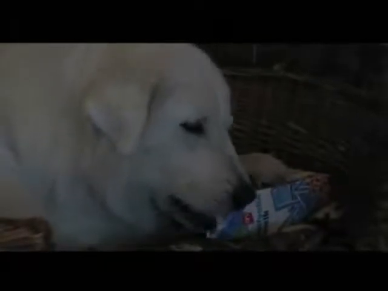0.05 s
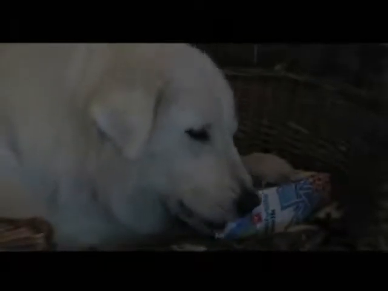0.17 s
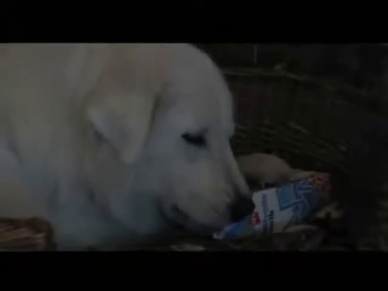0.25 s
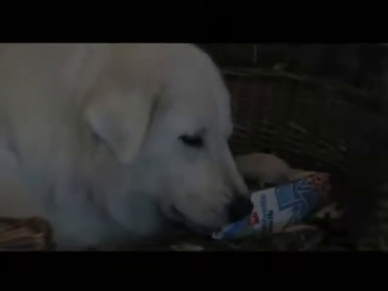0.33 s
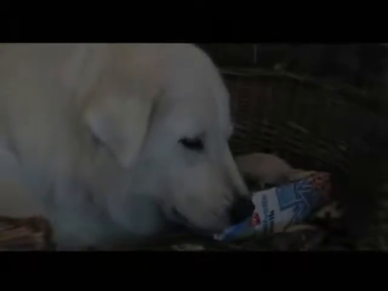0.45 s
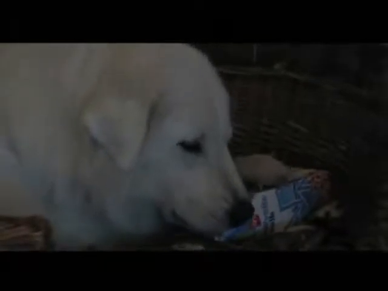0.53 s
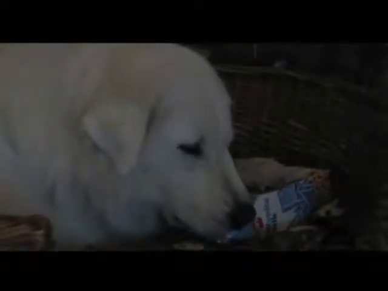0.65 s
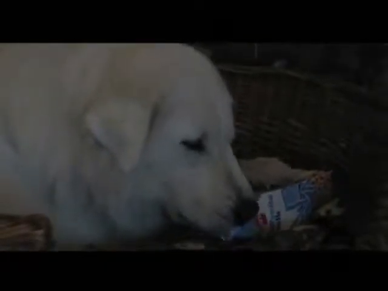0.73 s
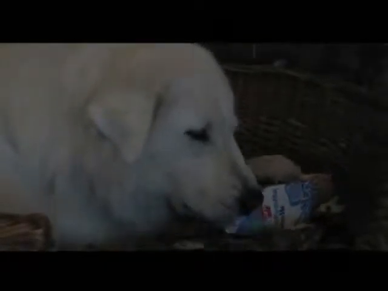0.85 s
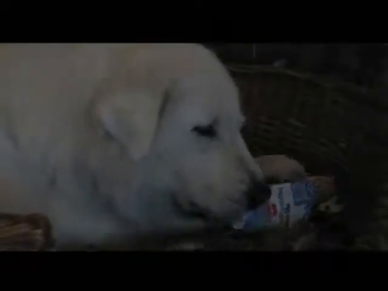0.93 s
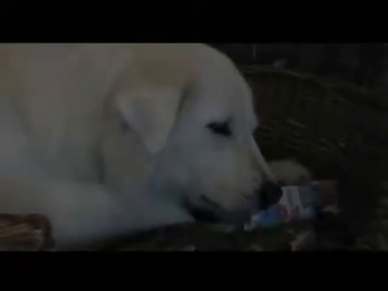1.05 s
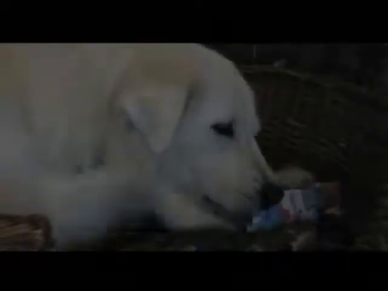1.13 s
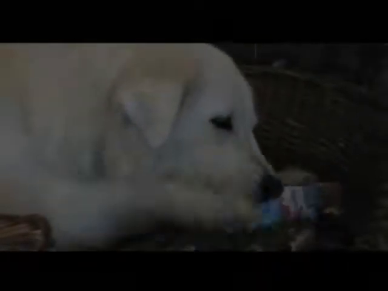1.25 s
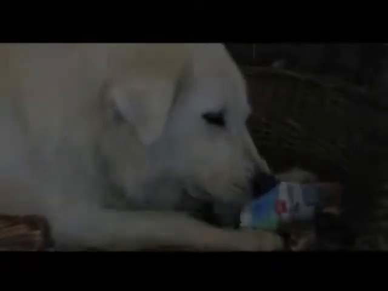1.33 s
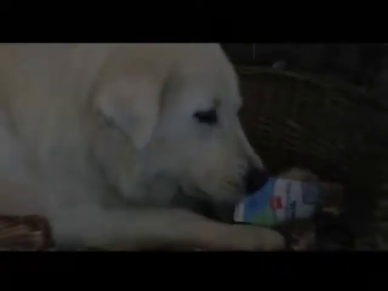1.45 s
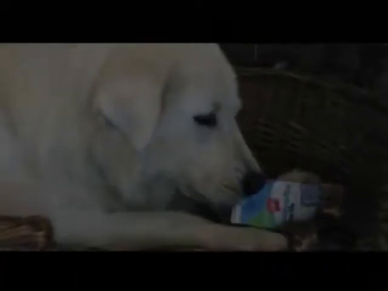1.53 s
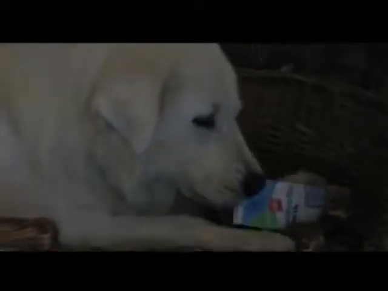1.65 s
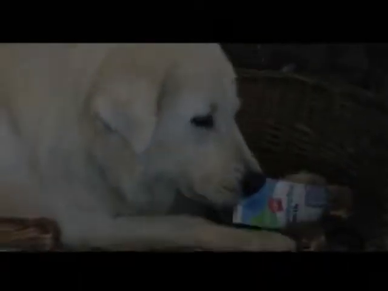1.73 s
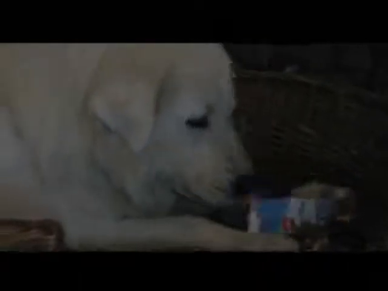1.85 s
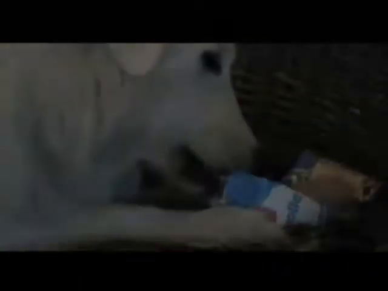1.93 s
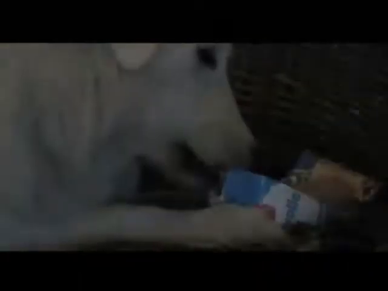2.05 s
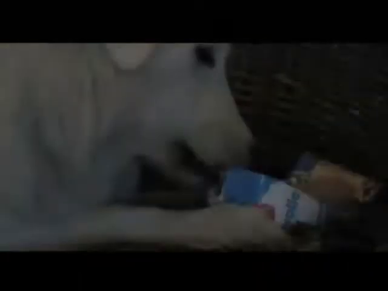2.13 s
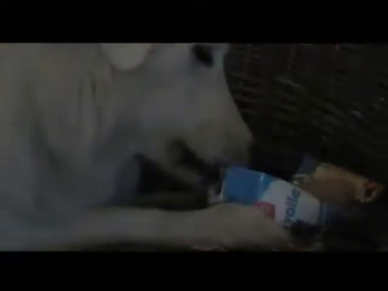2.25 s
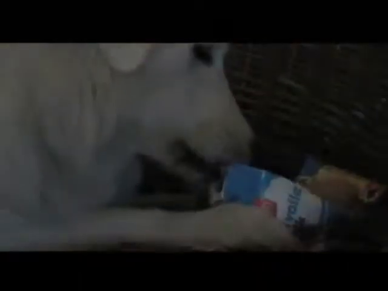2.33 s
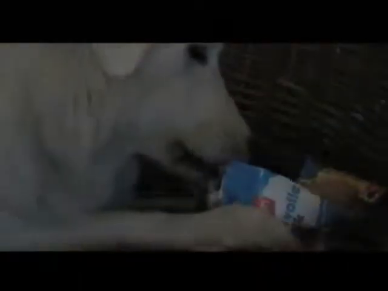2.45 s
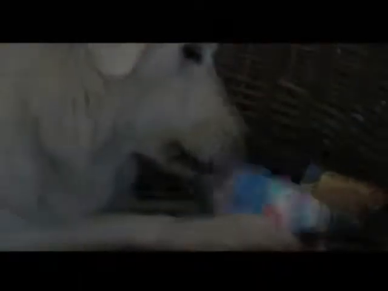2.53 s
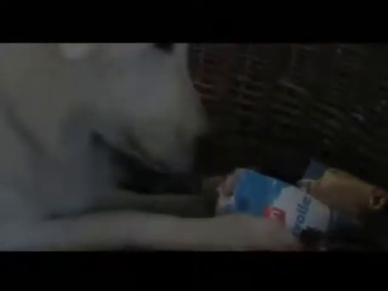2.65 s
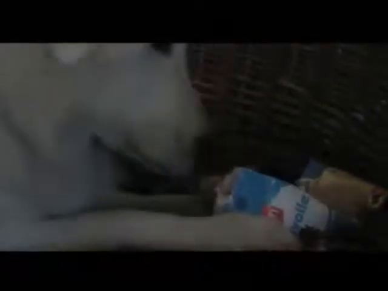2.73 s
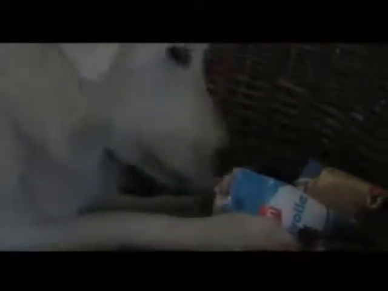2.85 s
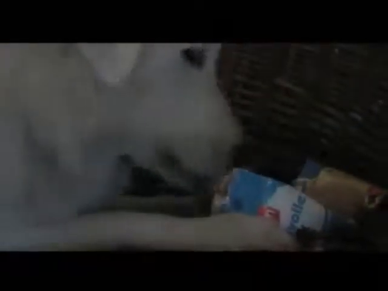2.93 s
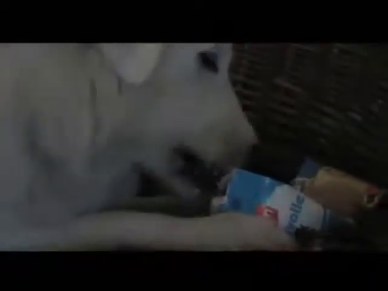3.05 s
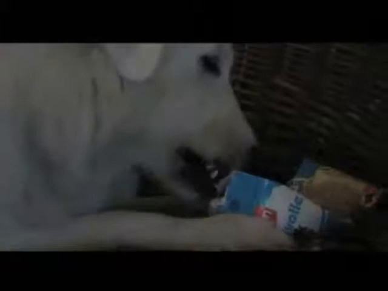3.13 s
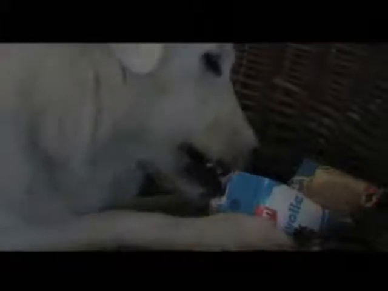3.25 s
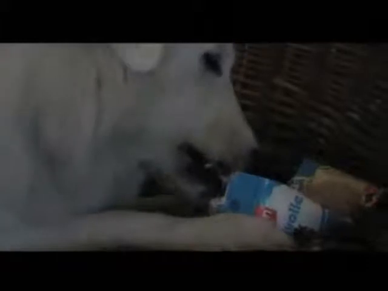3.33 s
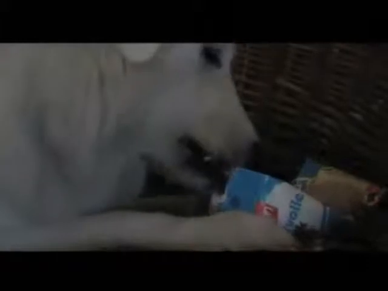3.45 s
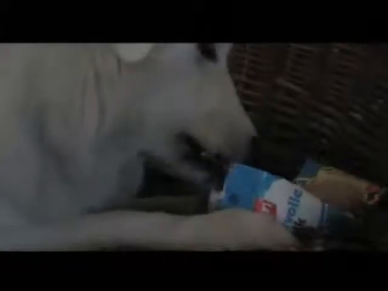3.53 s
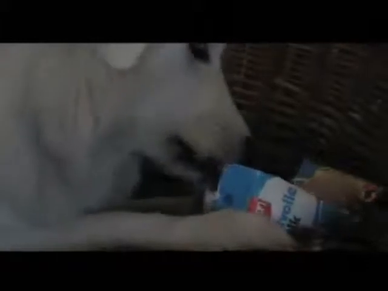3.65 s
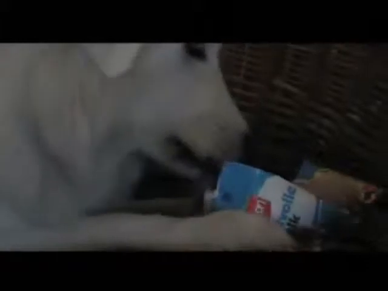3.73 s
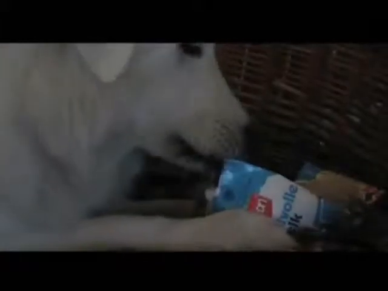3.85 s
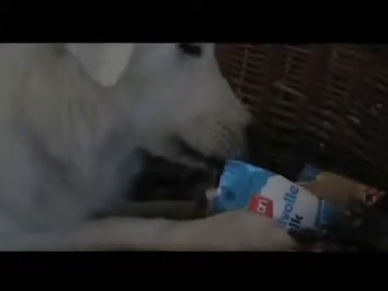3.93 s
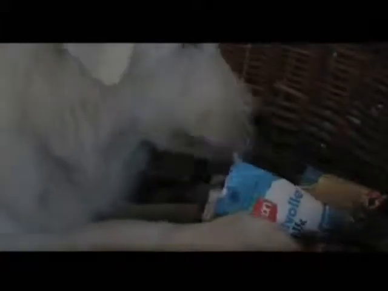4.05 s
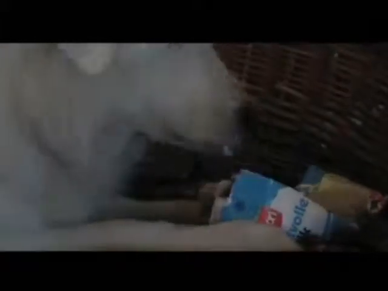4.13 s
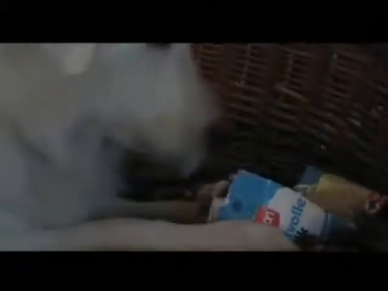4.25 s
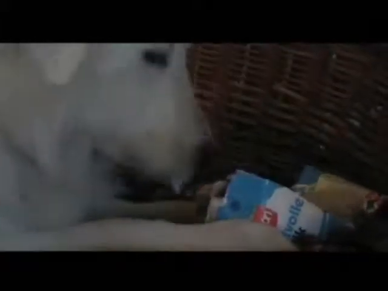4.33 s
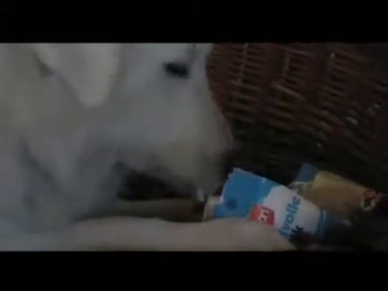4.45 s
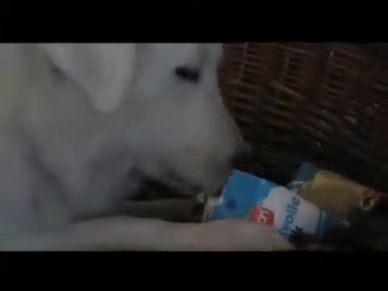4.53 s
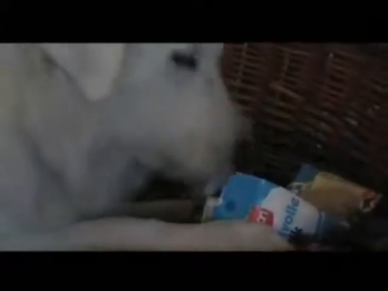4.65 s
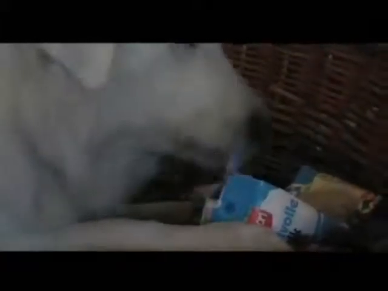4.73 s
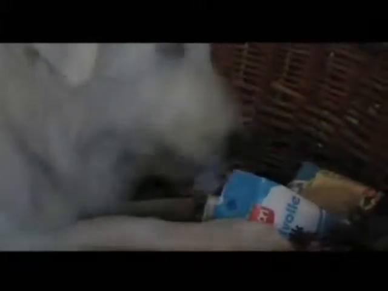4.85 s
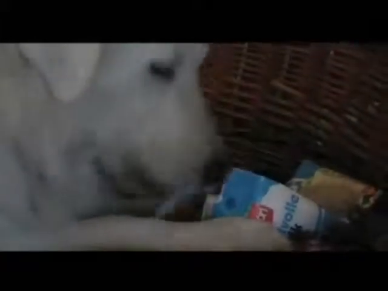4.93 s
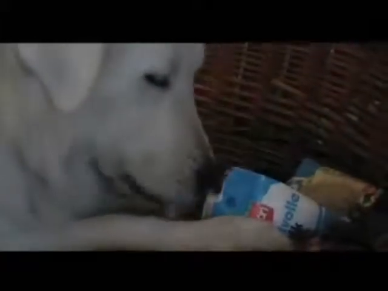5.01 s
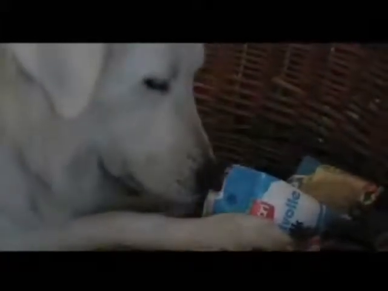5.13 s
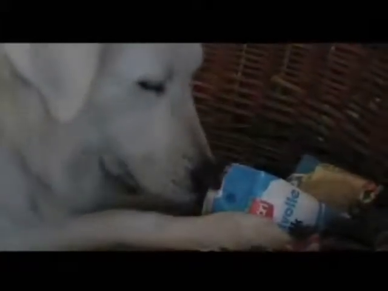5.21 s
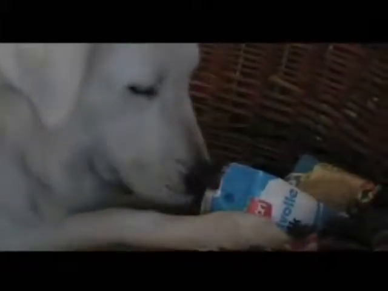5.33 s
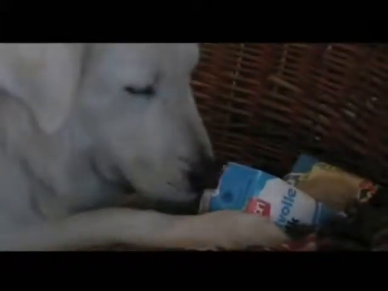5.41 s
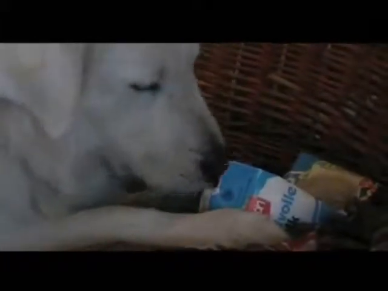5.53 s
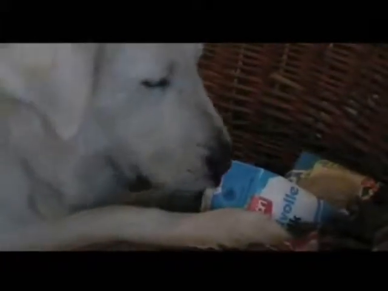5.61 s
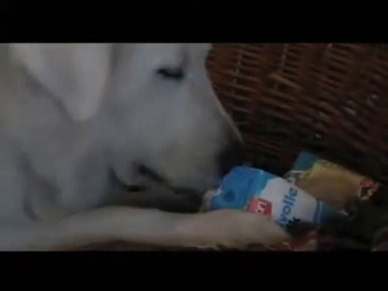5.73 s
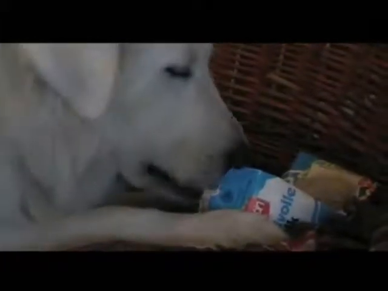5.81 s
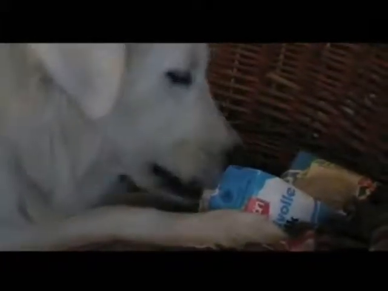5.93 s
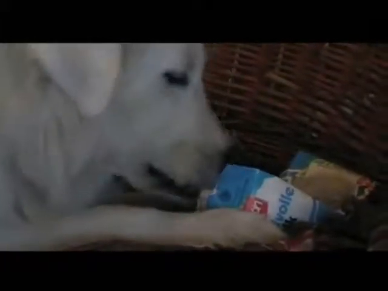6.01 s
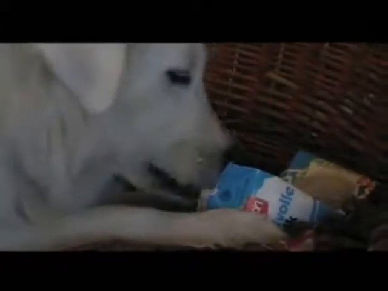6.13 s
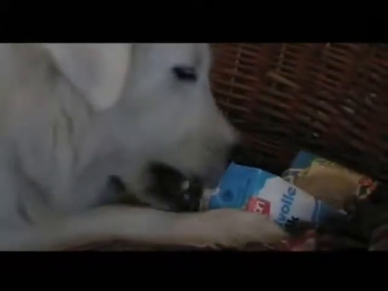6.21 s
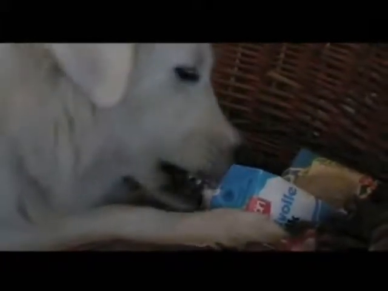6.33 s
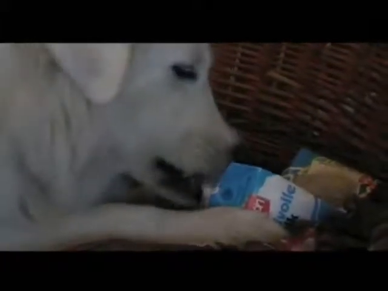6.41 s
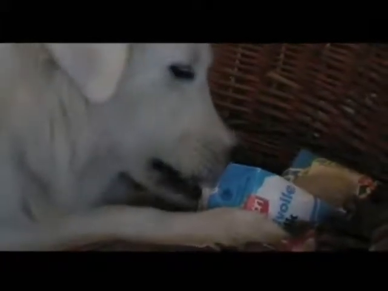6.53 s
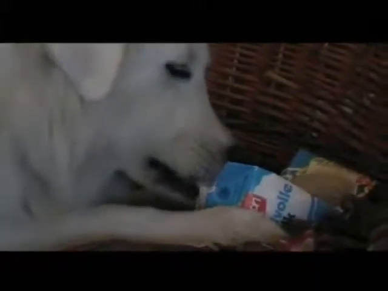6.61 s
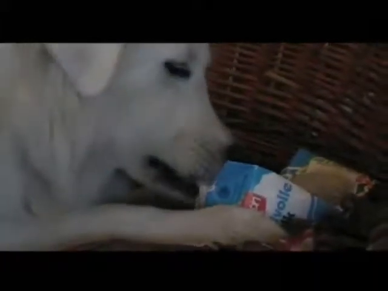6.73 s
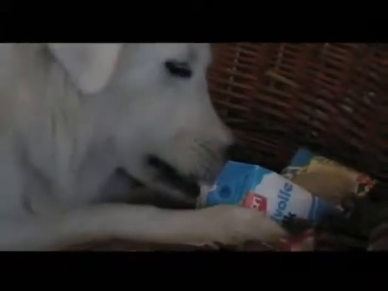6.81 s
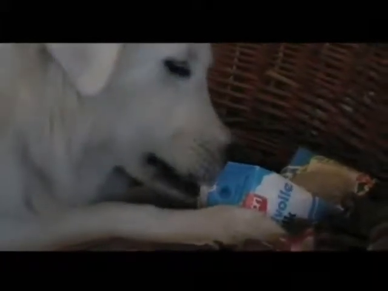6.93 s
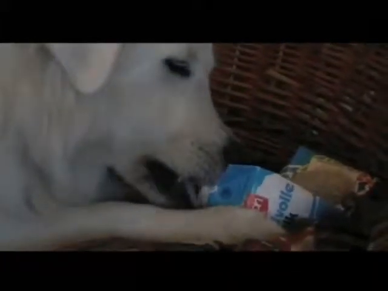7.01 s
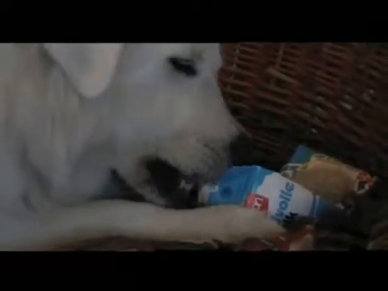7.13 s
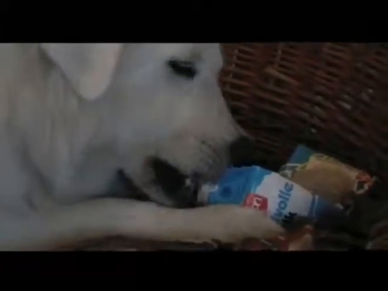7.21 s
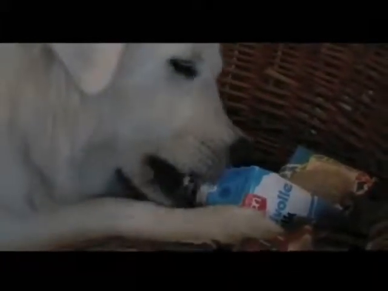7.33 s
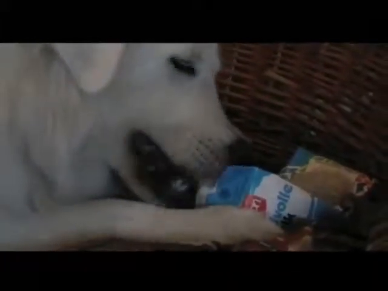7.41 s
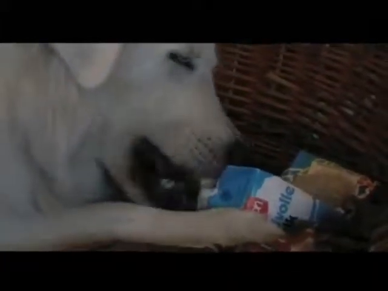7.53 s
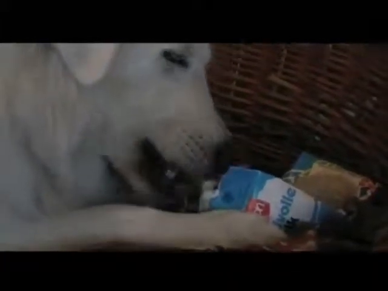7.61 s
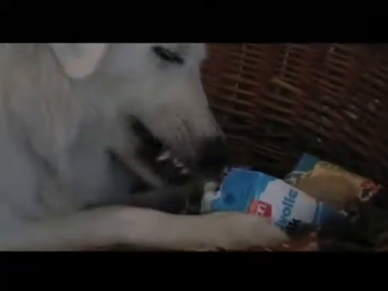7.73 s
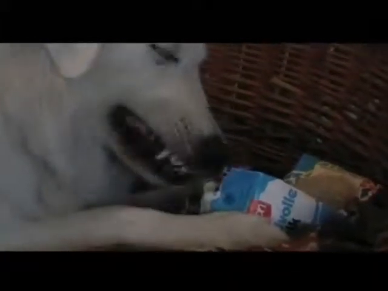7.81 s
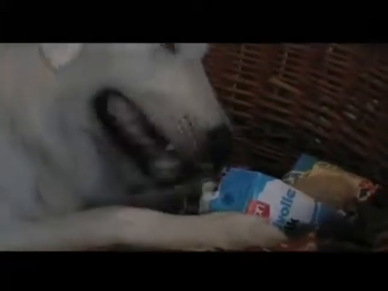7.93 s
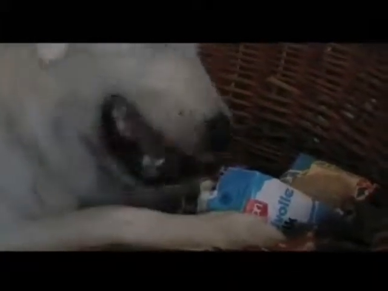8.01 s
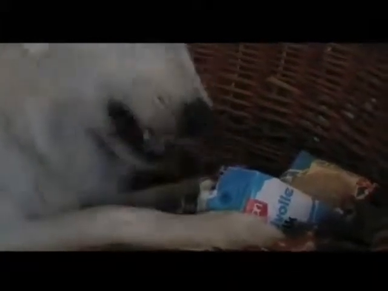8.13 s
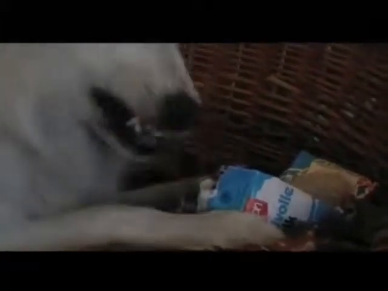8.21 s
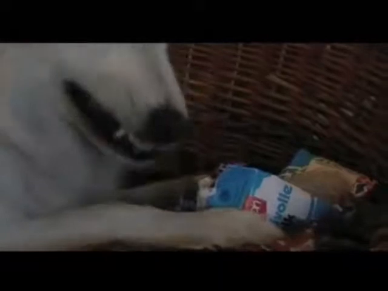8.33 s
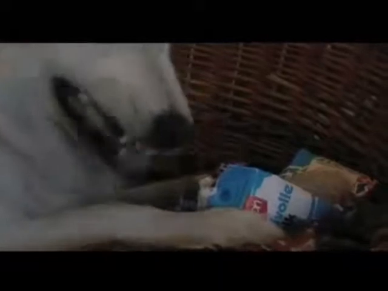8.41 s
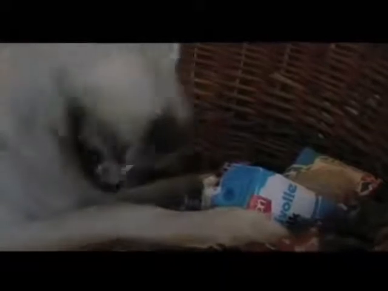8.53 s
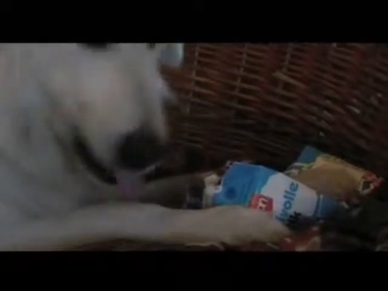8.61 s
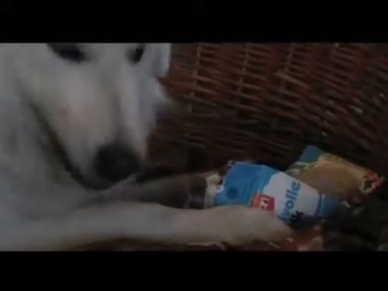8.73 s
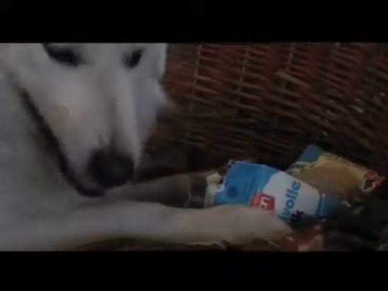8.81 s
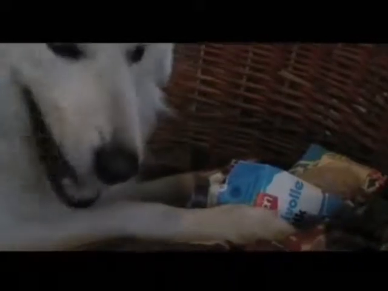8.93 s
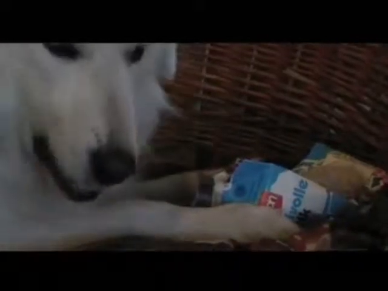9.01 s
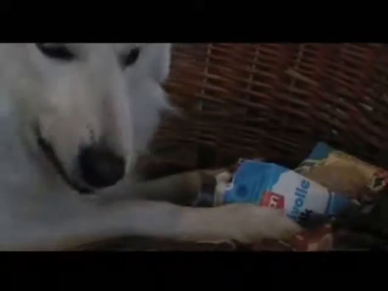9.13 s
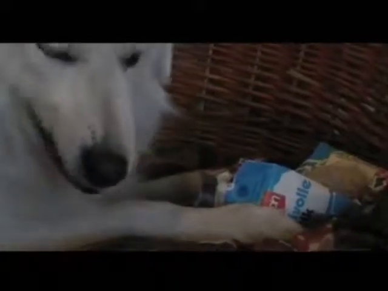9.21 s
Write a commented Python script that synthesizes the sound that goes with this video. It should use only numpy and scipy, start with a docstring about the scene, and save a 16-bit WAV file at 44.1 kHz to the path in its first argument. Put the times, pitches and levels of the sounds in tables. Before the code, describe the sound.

A large dog paws at a cardboard drink carton, fur scuffing on coated paper. It bites in with hollow knocks, crunching folds and bright crackles, the two hardest bites coming in the first half. Softer bites and rubbing follow, then chewing with clicking teeth, lip smacks and small saliva squelches. The microphone is close, in a hard room with a short echo. A faint motor whine and hiss continue throughout.

```python
"""A close motor whines over a steady hiss throughout. From the start a large dog paws a drink carton in a
wicker basket, fur dragging on coated paper, then bites and tears it: the hollow carton booms, folds crunch, the
paper crackles, teeth and lips click. A hard room rings on; at 1.99 s the room's ring stops dead, once. The
hardest bites land near 2.6 and 4.1 s. Then the dog chews the scraps with wet smacks, and from about 8 s saliva
squelches as the jaws part."""
import sys
import numpy as np
from scipy import signal
from scipy.fft import rfft, irfft, next_fast_len
from scipy.io import wavfile

SR = 44100
rng = np.random.default_rng(int(sys.argv[2]) if len(sys.argv) > 2 else 0)


def unload_audio(sound):
    """Save the sound as a 16-bit wav file, at the path given as the first command line argument."""
    columns = np.transpose(np.atleast_2d(sound))
    # keep every value between -1 and 1, then stretch to whole-number steps
    steps = np.round(np.clip(columns, -1, 1) * 32767)
    wavfile.write(sys.argv[1], SR, steps.astype(np.int16))


N = 408366
FFT_SIZE = next_fast_len(N, True)
FFT_HZ = np.maximum(np.fft.rfftfreq(FFT_SIZE, 1 / SR), 1)


def from_db(db):
    return np.exp(np.asarray(db) * np.log(10) / 20)


def unit_rms(x):
    return x / np.sqrt(np.mean(x ** 2) + 1e-20)


def at_hz(curve, hz):
    """Curve value, interpolated over log frequency."""
    curve_hz, values = np.array(curve).T
    return np.interp(np.log(hz), np.log(curve_hz), values)


def colour(x, spectrum):
    """Spectral shaping; white noise keeps its power."""
    gain = unit_rms(from_db(at_hz(spectrum, FFT_HZ)))
    return irfft(rfft(x, FFT_SIZE) * gain, FFT_SIZE)[..., :N]


def drift(rate_hz):
    """Slow random wander, rms 1."""
    hop, settle = 40, 2000
    pole = np.exp(-2 * np.pi * rate_hz * hop / SR)
    noise = rng.standard_normal(N // hop + settle + 2)
    slow = signal.lfilter([1], [1, -2 * pole, pole * pole], noise)[settle:]
    return np.interp(np.arange(N) / hop, np.arange(len(slow)), unit_rms(slow))


def grains(per_s, spread_db):
    """Random snaps of uneven size, rms 1."""
    sizes = from_db(spread_db * np.minimum(rng.exponential(1, N), 5)) * rng.choice([-1, 1], N)
    return unit_rms(sizes * (rng.random(N) < per_s / SR))


def cavity(x, hz, q):
    """Broad resonance of carton or mouth, passed three times as board and gums are soft; peak 1."""
    radius = np.exp(-np.pi * hz / q / SR)
    poles = [1, -2 * radius * np.cos(2 * np.pi * hz / SR), radius * radius]
    bandpass, lowpass = [1, 0, -1] + poles, [1, 2, 1] + poles
    ring = signal.sosfilt([bandpass, bandpass, lowpass], x + 1e-18)
    return ring / np.max(np.abs(ring))


# Motor overtones: (harmonic [number], level re MOTOR_DB [dB])
MOTOR_HARMONICS = [(1, -21.5), (2, -15.5), (3, -19), (4, -29.5), (5, -10.5), (6, 0.5), (7, -20.5), (8, -18),
                   (9, -27), (10, -63), (11, -34), (12, -28.5), (13, -31.5), (14, -29.5), (15, -32),
                   (16, -28.5), (17, -28.5), (18, -25), (19, -23.5), (20, -33), (21, -32), (22, -35),
                   (23, -32), (24, -40), (25, -44), (26, -34), (27, -31), (28, -37), (29, -41.5), (30, -45),
                   (31, -32), (32, -34), (33, -29), (34, -28.5), (35, -31), (36, -24), (37, -31), (38, -26),
                   (39, -41), (40, -31), (41, -34)]
# Further motor whine tones, between and above the 300 Hz harmonics: (frequency [Hz], rms level [dB])
FURTHER_WHINE_TONES = [(807, -73.5), (1350, -75), (1700, -83), (2550, -81), (3553, -87), (7106, -83.5),
                       (10013, -83), (10191, -88), (12452, -94)]
MOTOR_HZ, MOTOR_DB = 300.0, -57


def motor_whine():
    """Harmonics of an even motor pulse plus further whine tones, each wavering slightly in level."""
    t = np.arange(SR) / SR   # 1 s of whole cycles, looped
    harmonics = [(k * MOTOR_HZ, MOTOR_DB + level_db) for k, level_db in MOTOR_HARMONICS]
    whine = np.zeros(N)
    for hz, level_db in harmonics + FURTHER_WHINE_TONES:
        cycles = round(hz) * t + 0.34 * rng.random()
        tone = np.sqrt(2) * from_db(level_db) * np.sin(2 * np.pi * cycles)
        whine += np.resize(tone, N) * (1 + 0.043 * drift(rate_hz=3.3))
    return whine


# Hiss spectrum: (frequency [Hz], gain [dB])
HISS_SPECTRUM = [(20, -13), (60, -9), (166, -4), (500, -5), (900, -5), (1400, -11), (2000, -10),
                 (2500, -15), (4300, -23), (7000, -22), (10500, -24), (11800, -32.5), (12600, -32),
                 (13000, -46)]
# Left-right likeness: (frequency [Hz], correlation [0..1])
HISS_CORRELATION = [(60, 0.63), (300, 0.17), (1300, 0.07), (3000, 0.067), (6000, 0.043), (12000, 0.32)]
HISS_DB = -58


def hiss():
    """Room air and noise floor, partly shared by left and right, swelling slightly."""
    mid, side = rfft(rng.standard_normal((2, FFT_SIZE)))
    correlation = at_hz(HISS_CORRELATION, FFT_HZ)
    spectra = np.sqrt(1 + correlation) * mid + np.sqrt(1 - correlation) * side * [[1], [-1]]
    noise = irfft(spectra, FFT_SIZE)[:, :N]
    return from_db(HISS_DB + 0.8 * drift(rate_hz=3)) * unit_rms(colour(noise, HISS_SPECTRUM))


# Dull scuff, mid crunch and bright crackle spectra: (frequency [Hz], gain [dB])
SCUFF_SPECTRUM = [(30, -31), (140, -7), (300, 0), (700, 2.5), (1100, 0.5), (1500, -12), (3000, -26)]
CRUNCH_SPECTRUM = [(600, -3.5), (1100, -2), (1600, 3.5), (2400, -0.5), (3500, -8), (4700, -20.5),
                   (7000, -70)]
CRACKLE_SPECTRUM = [(3000, -1.5), (4900, -11), (5900, 1), (7200, 5), (9500, 6.5), (11200, 6), (12300, 4),
                    (13000, -32)]
# Paw and muzzle strokes: (peak time [s], length [s], scuff [dB], rasp [dB], rustle [dB])
STROKES = [(0.01, 0.39, -61, -52, -64.5), (0.087, 0.12, -51, -69, -54), (0.25, 0.3, -57, -52, -58),
           (0.504, 0.39, -46, -47, -54.5), (0.695, 0.49, -49, -48, -53), (0.86, 0.63, -47.5, -47.5, -55.5),
           (1.001, 0.32, -44, -44.5, -50.5), (1.065, 0.33, -42.5, -47.5, -50.5),
           (1.302, 0.19, -52, -66, -51.5), (1.42, 0.38, -51.5, -52.5, -59.5),
           (1.642, 0.23, -47.5, -55, -59.5), (1.89, 0.41, -59, -56, -61.5), (2.105, 0.2, -69, -74, -63),
           (2.214, 0.54, -58, -75, -69), (2.42, 0.53, -58, -57.5, -57), (2.596, 0.094, -40, -42, -40),
           (3.13, 0.82, -57.5, -74, -73), (3.54, 0.13, -57, -70, -69), (3.868, 0.37, -59.5, -57, -59),
           (4.017, 0.43, -69, -53.5, -58.5), (4.097, 0.12, -41, -38, -40), (4.55, 0.15, -53.5, -62, -64.5),
           (4.71, 0.21, -50.5, -57, -67.5), (5.036, 0.35, -60.5, -61, -73), (5.16, 0.15, -66, -65, -65),
           (5.575, 0.5, -60, -77, -82), (5.803, 0.39, -57, -60, -69), (5.903, 0.25, -62, -64, -65),
           (5.98, 0.36, -66, -57.5, -67), (6.436, 0.066, -58, -61, -78), (7.013, 0.19, -60, -64, -68),
           (7.154, 0.24, -62, -61.5, -69), (7.438, 0.3, -61, -82, -82), (7.60, 0.1, -55, -75, -73),
           (7.80, 0.13, -73, -72, -65), (8.07, 0.15, -68, -60, -63), (8.358, 0.2, -77, -63, -61),
           (8.604, 0.38, -60, -59, -62), (9.22, 0.75, -66, -63, -78)]
STROKE_EDGE_DB, STROKE_RISE_SHARE = -20, 0.35   # level at both ends re peak; swell over length
FUR_STIR_DB = (-69.5, -67, -86.5)   # scuff, rasp, rustle between strokes


def rubs():
    """Fur and paws drag on coated paper: dense, clumped grains; each stroke swells and dies away."""
    t = np.arange(N) / SR
    power = np.outer(from_db(FUR_STIR_DB), from_db(3.5 * drift(rate_hz=3))) ** 2
    for peak_s, length_s, *levels_db in STROKES:
        span = slice(max(round((peak_s - 2 * length_s) * SR), 0), round((peak_s + 2 * length_s) * SR))
        offset = (t[span] - peak_s) / length_s
        from_peak = np.maximum(-offset / STROKE_RISE_SHARE, offset / (1 - STROKE_RISE_SHARE))
        power[:, span] += np.outer(from_db(levels_db), from_db(STROKE_EDGE_DB * from_peak)) ** 2
    clumps = unit_rms(from_db(0.52 * drift(rate_hz=31)))
    scuff, rasp, rustle = np.sqrt(power) * clumps
    return (colour(scuff * grains(per_s=6000, spread_db=2.5), SCUFF_SPECTRUM)
            + colour(rasp * grains(per_s=8000, spread_db=1.5), CRUNCH_SPECTRUM)
            + colour(rustle * grains(per_s=16000, spread_db=-0.5), CRACKLE_SPECTRUM))


# Bites and tears: (time [s], hollow knock [dB], knock [Hz], low thump [dB], thump [Hz],
# fold crunch [dB], paper crackle [dB], decay [s])
BITES = [(0.227, -37.5, 2410, -56, 342, -53, -52.5, 0.027), (0.456, -55, 463, -40, 325, -50, -57, 0.017),
         (0.674, -37.5, 1190, -49, 294, -60, -44, 0.014), (0.784, -37, 960, -62, 320, -42, -43.5, 0.025),
         (1.047, -51, 600, -28.5, 390, -62, -58, 0.014), (1.124, -49, 960, -48, 387, -52, -33, 0.015),
         (1.155, -52, 940, -56, 424, -34, -25.5, 0.024), (1.173, -51, 890, -46, 350, -49, -39, 0.011),
         (1.193, -44, 1140, -44, 308, -43, -37, 0.012), (1.208, -53, 1190, -59, 291, -31.5, -25.5, 0.014),
         (1.219, -44, 872, -45, 230, -42, -32, 0.012), (1.621, -46, 1040, -47, 228, -39.5, -49.5, 0.01),
         (1.901, -27.5, 517, -26, 355, -26.5, -38, 0.012), (1.912, -26.5, 920, -34, 395, -50, -51, 0.015),
         (1.929, -31.5, 604, -30.5, 350, -43, -41.5, 0.024), (2.47, -44, 960, -66, 342, -44, -48.5, 0.011),
         (2.602, -26, 740, -23, 227, -29, -36.5, 0.024), (2.614, -18.5, 914, -34.5, 180, -32.5, -54, 0.02),
         (3.952, -51, 1030, -68, 136, -49, -52, 0.025), (4.096, -23, 1010, -28.5, 230, -27.5, -27, 0.0038),
         (4.107, -17, 880, -31, 189, -26.5, -37, 0.0086), (4.116, -21.5, 603, -35, 140, -31, -48, 0.0069),
         (4.125, -22, 950, -36, 400, -37, -50, 0.02), (4.157, -30, 720, -32, 353, -35.5, -46, 0.015),
         (4.536, -50, 820, -51, 268, -49.5, -62, 0.01), (4.631, -36.5, 596, -39.5, 310, -57, -51.5, 0.0098),
         (4.643, -31, 875, -41, 422, -41, -63, 0.0042), (4.668, -57, 816, -55, 340, -48.5, -49.5, 0.016),
         (5.817, -41, 900, -50, 223, -58, -67, 0.03), (5.963, -43, 860, -58, 146, -58, -56.5, 0.022),
         (6.238, -34.5, 584, -33.5, 351, -68, -74, 0.024), (6.248, -24.5, 877, -54, 275, -44, -71, 0.0062),
         (6.292, -47, 790, -48, 293, -64, -75, 0.017), (6.43, -48, 650, -62, 200, -62, -70, 0.0068),
         (6.442, -39.5, 915, -58, 164, -55, -73, 0.011), (7.247, -41.5, 594, -39.5, 305, -59, -66, 0.0055),
         (7.256, -32.5, 880, -59, 220, -54, -68, 0.0086), (7.597, -42.5, 795, -39, 236, -61, -64, 0.0071),
         (8.307, -56, 740, -57, 248, -69, -66, 0.012), (8.671, -45.5, 850, -60, 403, -68, -70, 0.01)]


def bites():
    """One hard contact, then a fast swell of fibre snaps that thins out; both ring the hollow carton."""
    t = np.arange(SR // 5) / SR
    power, boom = np.zeros((2, N + SR)), np.zeros(N + SR)
    snaps = grains(per_s=3400, spread_db=4.0)
    for time_s, knock_db, knock_hz, thump_db, thump_hz, *levels_db, decay_s in BITES:
        start = round(time_s * SR)
        span = slice(start, start + len(t))
        snap_envelope = (1 - np.exp(-t / (0.067 * decay_s))) * np.exp(-t / decay_s)
        paper_envelope = (1 - np.exp(-t / (0.14 * decay_s))) * snap_envelope
        power[:, span] += np.outer(from_db(levels_db), paper_envelope) ** 2
        blow = snap_envelope * snaps[span]
        blow[0] = 13.1   # hard contact
        boom[span] += from_db(knock_db) * cavity(blow, knock_hz, q=2.2)
        boom[span] += from_db(thump_db) * cavity(blow, thump_hz, q=0.84)
    crunch, crackle = np.sqrt(power[:, :N])
    return (boom[:N] + colour(crunch * grains(per_s=6000, spread_db=3.0), CRUNCH_SPECTRUM)
            + colour(crackle * grains(per_s=20000, spread_db=2.0), CRACKLE_SPECTRUM))


# Tooth and lip clicks: (time [s], bright click [dB], mouth ring [dB], mouth resonance [Hz])
SMACKS = [(0.677, -37, -44, 2290), (0.976, -34, -50, 2500), (1.117, -37, -41, 2360),
          (1.1283, -36, -47, 2570), (1.143, -38, -52, 2400), (1.1495, -21, -38, 2380),
          (1.39, -38, -48, 2400), (1.426, -32, -57, 3800), (1.7724, -57, -43, 2610),
          (1.904, -48, -27, 2050), (2.27, -62, -47, 900), (2.381, -41, -47, 3640), (2.601, -25, -32, 2430),
          (4.6298, -46, -42, 3020), (5.005, -60, -53, 1500), (5.042, -64, -48.5, 3450),
          (6.239, -64, -53, 2360), (7.7966, -45, -56, 2400), (8.3145, -44, -53, 2300),
          (8.4713, -58, -46, 1600), (8.925, -39.5, -54, 1500), (9.0225, -39.5, -40, 3300)]
SMACK_RISE_S, SMACK_DECAY_S = 0.00042, 0.002


def smacks():
    """Teeth and wet lips click: a brief noise burst that rings in the mouth cavity."""
    t = np.arange(SR // 30) / SR
    envelope = (1 - np.exp(-t / SMACK_RISE_S)) * np.exp(-t / SMACK_DECAY_S)
    bursts = envelope * rng.choice([-1., 1.], (len(SMACKS), len(t)))
    bright, ring = np.zeros(N), np.zeros(N)
    for (time_s, bright_db, ring_db, mouth_hz), burst in zip(SMACKS, bursts):
        start = round(time_s * SR)
        bright[start:start + len(t)] += from_db(bright_db) * burst
        ring[start:start + len(t)] += from_db(ring_db) * cavity(burst, mouth_hz, q=2.9)
    return colour(bright, CRACKLE_SPECTRUM) + ring


# Jaws parting: (peak time [s], fade [s], bright level [dB], mid level [dB])
SQUELCHES = [(7.95, 0.006, -63, -76), (8.325, 0.013, -47.5, -52), (8.475, 0.01, -72, -63),
             (8.605, 0.015, -49.5, -54), (9.03, 0.017, -56.5, -51.5), (9.195, 0.012, -73, -57)]
SQUELCH_RISE_PER_FADE = 0.61


def squelches():
    """Saliva films burst in a soft clump of grains: quick swell, slower fade."""
    t = np.arange(-SR // 5, SR // 5) / SR
    envelopes = np.zeros((2, N + SR))
    for peak_s, fade_s, *levels_db in SQUELCHES:
        start = round((peak_s + t[0]) * SR)
        envelope = np.exp(-np.maximum(-t / SQUELCH_RISE_PER_FADE, t) / fade_s)
        envelopes[:, start:start + len(t)] += np.outer(from_db(levels_db), envelope)
    bright, mid = envelopes[:, :N]
    return (colour(bright * grains(per_s=9000, spread_db=3.5), CRACKLE_SPECTRUM)
            + colour(mid * grains(per_s=5500, spread_db=6.5), CRUNCH_SPECTRUM))


# Room decay: (frequency [Hz], T60 [s])
ROOM_T60 = [(100, 0.44), (400, 0.52), (900, 0.45), (1800, 0.55), (5000, 0.44), (12000, 0.28)]
# Echo width: (frequency [Hz], side re mid [dB])
ROOM_WIDTH = [(100, -19), (1000, -7.5), (5000, -13), (9000, -10), (12000, -76)]
ECHO_RE_DIRECT_DB, ECHO_RISE_S = -3.5, 0.0017


def room(x):
    """Hard room: direct sound plus third-octave bands of dying noise; only the echoes are stereo."""
    t, echoes = np.arange(SR) / SR, 0
    swell = np.minimum(t / ECHO_RISE_S, 1)
    for low_hz in 50 * 2 ** np.arange(0, 8.3, 1 / 3):
        bandpass = signal.butter(2, [low_hz, 2 ** (1 / 3) * low_hz], "band", fs=SR, output="sos")
        decay = from_db(-60 * t / at_hz(ROOM_T60, low_hz))
        band = signal.sosfilt(bandpass, rng.standard_normal((2, SR))) * swell * decay
        band *= np.sqrt(low_hz / np.sum(band ** 2, axis=1, keepdims=True))   # equal energy per Hz
        echoes = echoes + band * from_db([[0], [at_hz(ROOM_WIDTH, low_hz)]])
    mid, side = from_db(ECHO_RE_DIRECT_DB) * echoes / np.sqrt(np.sum(echoes[0] ** 2))
    mid[0] = 1   # direct sound
    response = np.array([mid + side, mid - side]) / np.sqrt(np.sum(mid ** 2))
    return signal.fftconvolve(x[None], response, axes=1)[:, :N]


RING_STOP_S = 1.99


def scene():
    """Carton and mouth in the room, over hiss and motor; at 1.99 s the room's ring of the carton sounds stops
    dead, once."""
    highpass = signal.butter(4, 105, "high", fs=SR, output="sos")   # a small box radiates no deep bass
    carton = signal.sosfilt(highpass, bites() + rubs())
    mouth = 0.5 * (smacks() + squelches())   # close: half dry, half through the room
    early = np.arange(N) < RING_STOP_S * SR
    stopped = room(carton * early) * early
    ringing = room(carton * ~early + mouth)
    return stopped + ringing + mouth + hiss() + motor_whine()


# Channel balance: (frequency [Hz], left re right [dB])
LEFT_LEAN = [(60, 1.5), (180, 2.5), (510, 3.0), (1500, 1), (4400, -1), (12900, 0)]
STOPBAND_HZ = 13469


def record(dry):
    """Low mids lean left; the top treble is cut."""
    lean = from_db(at_hz(LEFT_LEAN, FFT_HZ) * [[0.5], [-0.5]])
    leaned = irfft(rfft(dry, FFT_SIZE) * lean, FFT_SIZE)[:, :N]
    lowpass = signal.cheby2(14, 60, STOPBAND_HZ, fs=SR, output="sos")
    return signal.sosfilt(lowpass, leaned)


dry = scene()
out = record(dry)
unload_audio(out)
```